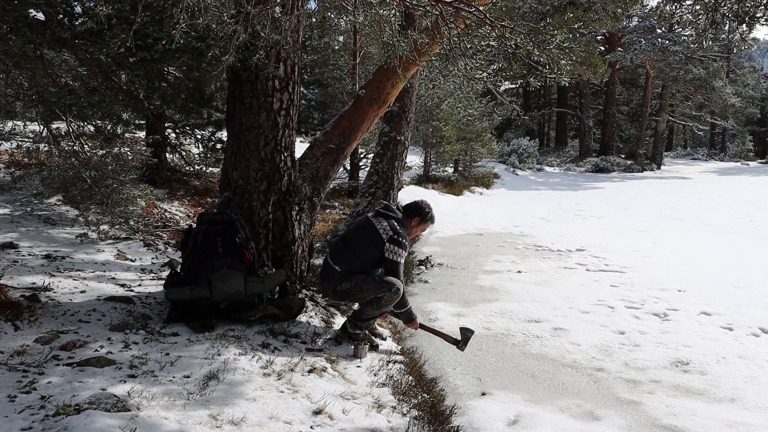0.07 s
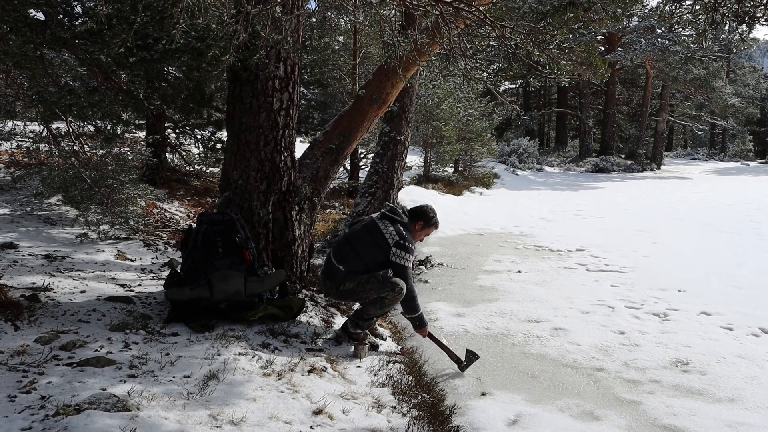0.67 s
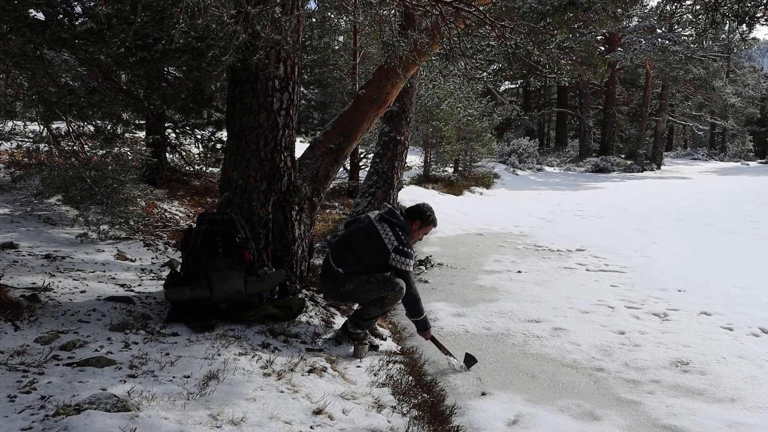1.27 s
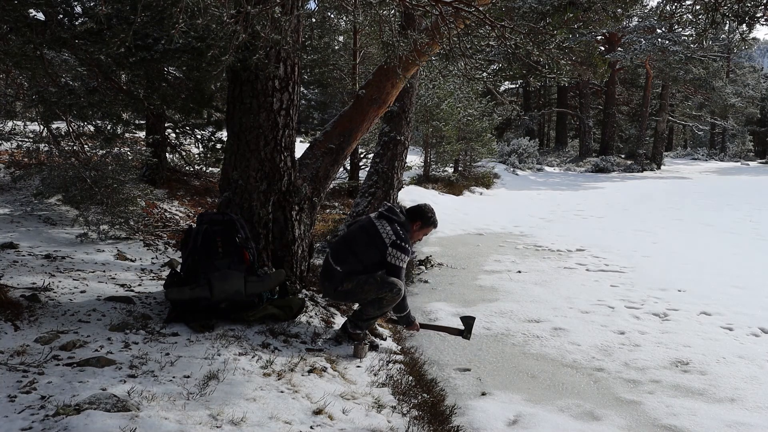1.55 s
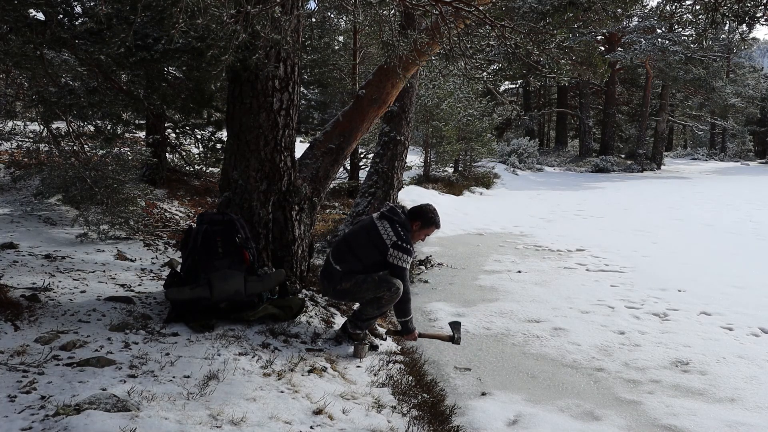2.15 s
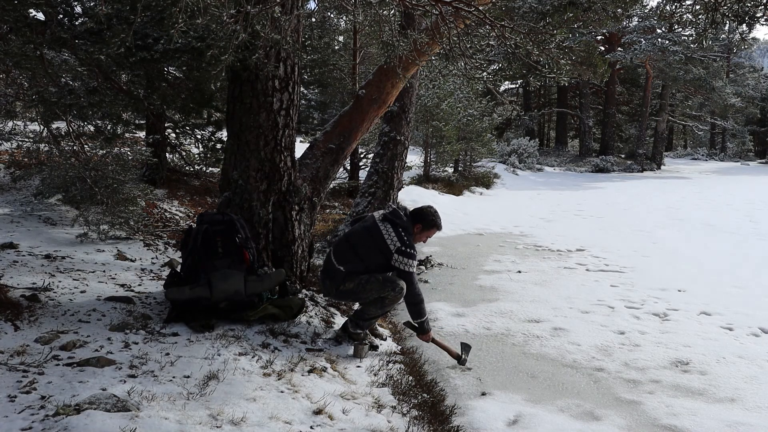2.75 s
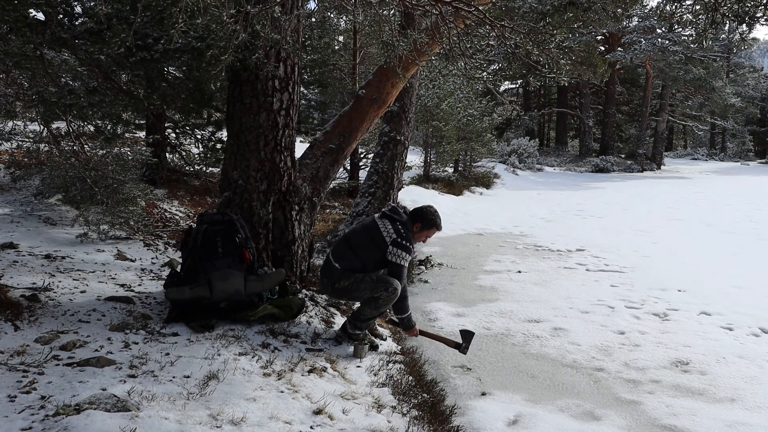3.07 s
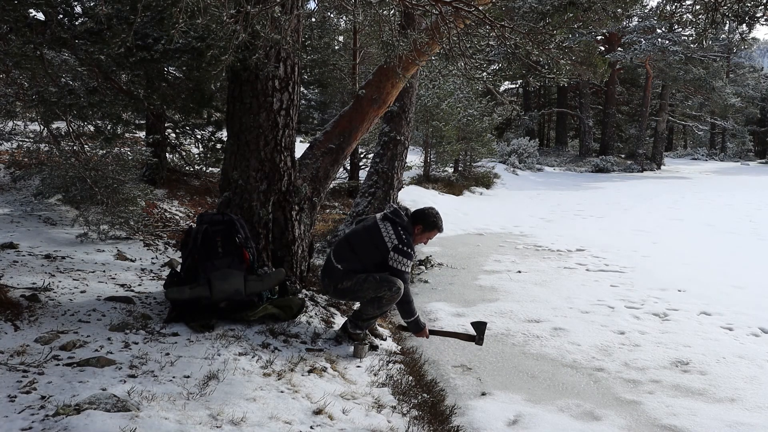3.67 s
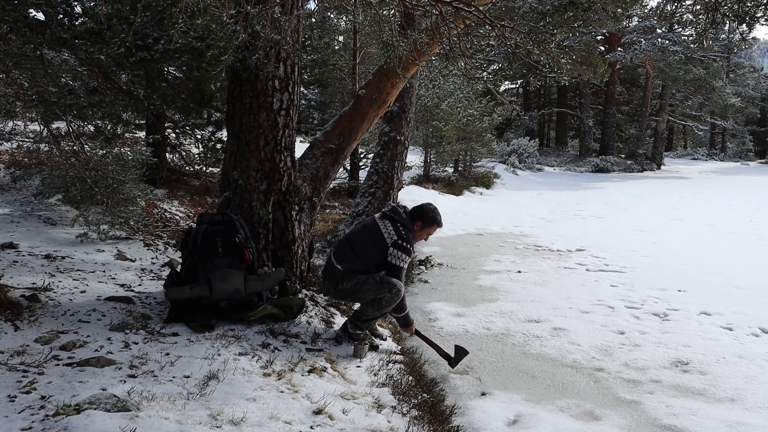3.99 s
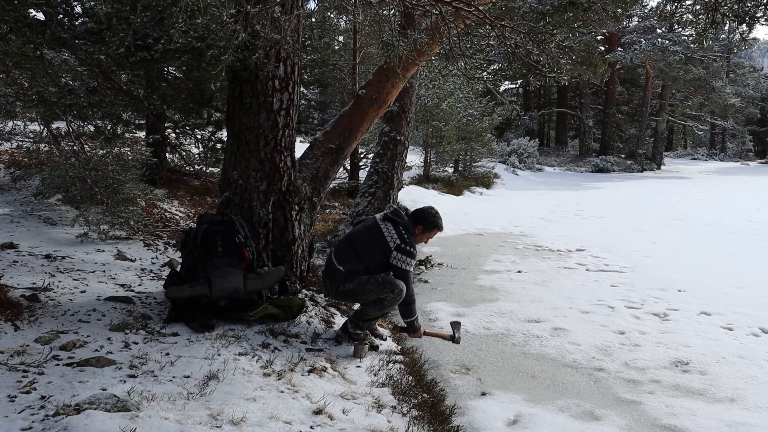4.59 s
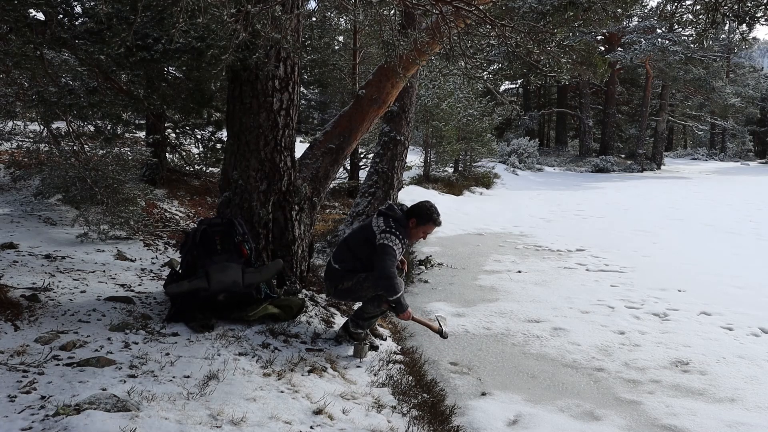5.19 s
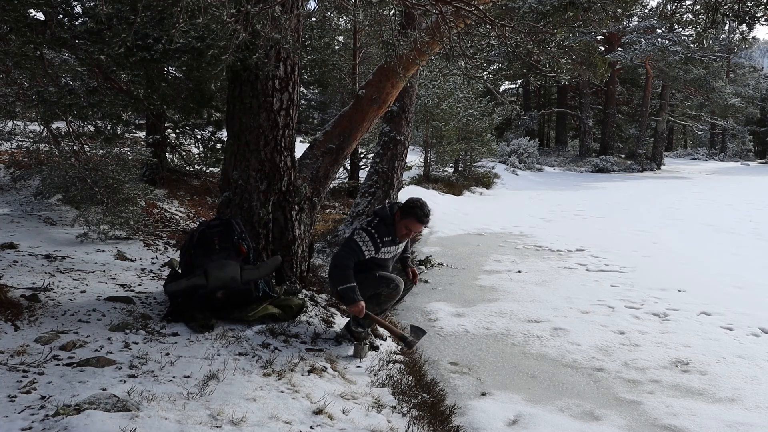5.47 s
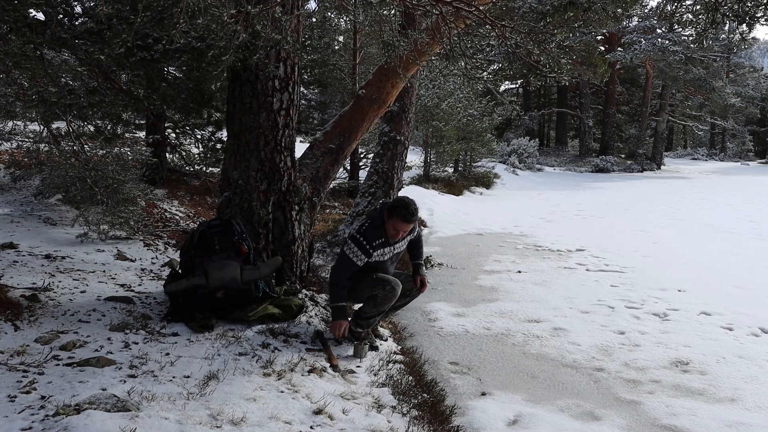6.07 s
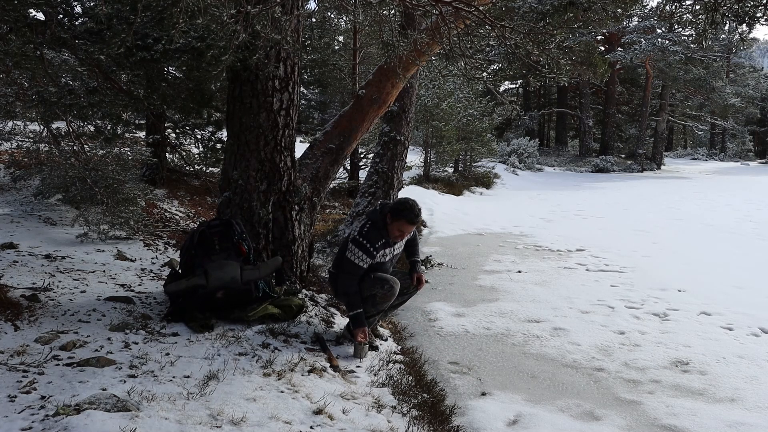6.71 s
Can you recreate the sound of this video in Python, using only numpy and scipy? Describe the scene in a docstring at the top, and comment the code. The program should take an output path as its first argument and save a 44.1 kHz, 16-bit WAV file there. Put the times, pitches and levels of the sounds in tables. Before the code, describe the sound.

An axe chops nearby into the ice of a frozen forest lake, over a faint hush and a light wind rumble on the microphone. The sound opens on fading slush. Blows land at about 0.7, 1.3, 1.9, 2.4, 2.9, 3.4 and 3.9 seconds, with a last one at 4.8 after a short pause. Each is a thump and a sharp, brittle crack, with a small wet splash, a faint high steel ring and a thin echo from the trees. Ice chips tick and tinkle between blows, mostly in the first two seconds, and small bubbles plop near 3.1 and 4.1. From 5 seconds boots shuffle quietly in wet snow, with a soft thud at 5.4. The axe is laid down with a faint rattle around 6 seconds. A very faint, distant whine follows and fades, and thin metal clinks lightly at about 6.6.

```python
"""At the edge of a frozen forest lake, an axe chops a hole in the ice. Each impact excites damped modes
of the sheet and the steel head, and brittle fracture releases runs of snaps. Chips patter down, slush
and bubbles gurgle, and boots shift in wet snow. The axe is laid down and thin metal clinks, each ringing
in its own modes. Behind it are the hush and echo of the trees, light turbulent wind on the microphone
and, near the end, a faint far whine."""
import sys
import numpy as np
from scipy import signal
from scipy.fft import rfft, irfft, next_fast_len
from scipy.io import wavfile
from scipy.ndimage import uniform_filter1d

SR = 44100
rng = np.random.default_rng(int(sys.argv[2]) if len(sys.argv) > 2 else 0)


def persist_wave(psi):
    """Save psi, clipped to +-1, as 16-bit WAV."""
    counts = np.round(np.clip(psi, -1, 1) * 32767).astype(np.int16)
    wavfile.write(sys.argv[1], SR, np.atleast_2d(counts).T)


N = 306054
CLOCK = np.arange(N) / SR  # scene time/s
T = np.arange(int(.7 * SR)) / SR  # time within one event/s

# Relative spectral densities: f/Hz, level/dB
HUSH_SPECTRUM = [(59, -39.5), (100, -3.5), (150, -6.5), (570, -8), (1760, -17), (3190, -18.5),
                 (3780, -22.5), (4770, -20), (5650, -22), (15000, -24), (16000, -28.5)]  # still forest air
WIND_SPECTRUM = [(8, -5), (25, 3.5), (45, -2.5), (70, -12), (100, -21.5), (150, -31), (300, -76),
                 (1000, -100)]  # turbulence at the microphone
GRIT_SPECTRUM = [(100, -7), (800, -6), (1700, -28), (2700, 4.5), (3800, -11), (4800, 8), (6000, -5),
                 (10000, 0), (16000, -11)]  # grit scraping under metal
SLUSH_SPECTRUM = [(60, 1.5), (200, -9), (600, -4), (1300, 0.5), (2800, -9), (3800, -14), (4900, -8.5),
                  (6000, -20), (10000, -22), (16000, -35)]  # slush and wet snow
CHIP_SPECTRUM = [(200, -36.5), (1200, -2), (2500, 0.5), (4800, 4), (6000, -6.5), (8000, 2.5), (12000, -3.5),
                 (16000, -11.5)]  # small pieces of ice colliding
LEAD_IN_SPECTRUM = [(100, 2.5), (600, 6), (1600, 7.5), (3000, -12), (6000, -22.5), (16000, -61)]  # dull rush of noise just before a blow
CRACK_SPECTRUM = [(60, -68.5), (180, 4), (450, 4), (850, 0.5), (1500, 5), (2000, 0.5), (2900, 3.5),
                  (3700, -7.5), (4800, -5.5), (5900, -20), (7800, -13), (11000, -19.5), (16000, -31)]  # hard ice breaking
ECHO_SPECTRUM = [(80, 3.5), (300, -18.5), (1500, -8.5), (3000, -13.5), (6000, -7.0), (16000, -74)]

# Normal modes: f/Hz, relative level/dB, t60/s
AXE_HEAD_MODES = [(4893, 0, .32), (4874, -9, .2), (4635, -10, .09), (2299, -21, .3), (9760, -30, .22)]  # the steel head in a blow
AXE_BODY_MODES = [(810, -9, 0.12), (1280, -3.5, 0.07), (2025, -6.5, 0.096), (2620, -1, 0.043),
                  (2735, -3, 0.082), (3020, -4.5, 0.11), (3380, 0, 0.04), (4800, -2, 0.068),
                  (4830, -1.5, 0.11), (7800, -7, 0.12), (8538, -9, .2)]  # the axe as it is laid down
THIN_METAL_MODES = [(860, -11.5, 0.24), (1264, -15.5, 0.24), (1860, -25, 0.35), (2400, -7, 0.17),
                    (2840, -14.5, 0.34), (3140, -16, 0.12), (4800, 1.5, 0.068), (4960, -8, 0.16),
                    (6030, -13, 0.11), (6940, -3, 0.096), (7700, -6, 0.15), (8320, 0, 0.076),
                    (9770, -6, 0.085), (10550, -1, 0.06), (11215, -9, 0.083), (11600, -7, 0.1),
                    (12500, -15, .08)]  # a thin metal object

# Strength of the wind on the microphone: t/s, level/dB
WIND_LEVELS = [(0.0, -45), (0.04, -44.5), (0.89, -51), (0.93, -42), (1.59, -62), (2.32, -40), (2.47, -55),
               (2.51, -41.5), (3.36, -41.5), (3.44, -54), (3.52, -35.5), (3.86, -42.5), (4.76, -40.5),
               (4.83, -49), (5.16, -45.5), (5.2, -54.5), (6.9, -49), (6.94, -53)]
# Light impacts: t/s, level/dB
FOOTFALLS = [(5.072, -47), (5.179, -45.5), (5.415, -29.5), (6.246, -51), (6.735, -45.5)]  # boots on the edge of the ice
AXE_CONTACTS = [(5.9965, -50), (6.009, -57), (6.092, -63), (6.116, -62), (6.175, -68.5), (6.205, -63),
                (6.238, -59)]  # the axe settling
THIN_METAL_CONTACTS = [(6.6424, -43.5), (6.672, -56.5)]  # the thin metal touching down
# Swells of granular noise: centre t/s, duration/s, level/dB
SNOW_SHUFFLES = [(5.22, 0.66, -63), (5.45, 0.19, -57), (5.8, 0.39, -62), (6.12, .2, -64.5),
                 (6.9, 0.15, -63)]  # boots and clothes shifting on snow
CRUMB_SHOWERS = [(.87, 0.094, -61), (1.06, 0.27, -58), (1.64, 0.14, -56.5), (1.755, 0.11, -52.5),
                 (3.08, .24, -67), (4.17, 0.12, -68)]  # ice crumbs shed as the blade is pulled free
# Air bubbles in the hole: t/s, level/dB, starting f/Hz, t60/s
HOLE_BUBBLES = [(3.074, -40.5, 1840, 0.036), (4.077, -50, 800, 0.015), (4.079, -34.5, 460, 0.011),
                (4.1134, -35, 1340, 0.013), (4.117, -48.5, 2090, 0.033), (5.416, -34, 670, 0.0087)]
# Larger chips landing or kicked: t/s, level/dB, f/Hz, treble shelf/dB
CHIP_IMPACTS = [(0.346, -49, 3840, -1), (0.4457, -48, 7000, -6), (0.627, -48.5, 3520, 9),
                (0.8334, -42, 4920, 26), (.8435, -49, 5000, 2), (0.9465, -47, 1590, -16),
                (0.963, -44.5, 2090, -7.5), (1.0039, -46, 4950, -3), (1.0597, -40, 2840, 2.5),
                (1.096, -45, 3120, -3), (1.111, -46, 11000, 8), (1.602, -45, 2220, -18),
                (1.6201, -39.5, 4870, -10), (1.6746, -44, 2110, -9), (1.7273, -42, 5000, 21),
                (2.1027, -50, 9100, 11), (3.0138, -48.5, 2900, -6), (3.0705, -46.5, 4580, 1),
                (3.101, -48, 4340, -14), (5.473, -54.5, 1520, -29), (5.819, -54, 2120, -5),
                (6.870, -53, 2400, -19)]
# First cracks, then the ice giving way: t/s, level/dB, t60/s, f/Hz of the piece, treble shelf/dB
ICE_CRACKS = [(.6676, -10.5, 0.012, 1030, 7.5), (0.6749, -17.5, 0.05, 2300, 3.5),
              (0.6973, -31, 0.028, 1460, 4), (1.3462, -18, 0.024, 1560, -2.5), (1.3580, -32, 0.21, 1410, 1),
              (1.3800, -31.5, 0.026, 2650, 9), (1.3893, -26, 0.049, 1450, 0),
              (1.8704, -20, 0.066, 1970, 7.5), (1.8807, -27, 0.019, 1620, 4), (2.3648, -21, 0.062, 2140, 5),
              (2.3718, -20.5, 0.027, 1610, -21), (2.8818, -21, 0.037, 1210, 4.5),
              (2.894, -35, 0.22, 990, -9), (3.4000, -19.5, 0.031, 2550, 3.5), (3.4120, -44, 0.15, 604, 10),
              (3.928, -16, 0.013, 1350, 5), (3.9307, -16.5, 0.007, 2620, 7), (3.9350, -27, 0.05, 2180, 5),
              (4.7884, -22.5, 0.044, 1940, 8.5), (4.8000, -24, 0.1, 1110, 1.5)]
# Axe blows: t/s, thump level/dB, thump f/Hz, knock level/dB, knock f/Hz, slush level/dB, slush t60/s,
# steel level/dB, rebound level/dB, backwash level/dB
AXE_BLOWS = [(-.09, -18, 220, -14, 900, -43.5, 0.83, -40, -35, -69),
             (0.6672, -17, 232, -9, 704, -33.5, 0.23, -34, -32, -64),
             (1.3465, -18.5, 328, 0, 1664, -31.5, 0.34, -48, -39, -53),
             (1.8706, -14.5, 201, -26, 900, -35, 0.21, -53, -31.5, -65.5),
             (2.3653, -11, 424, -15.5, 1630, -29, 0.13, -51.5, -37, -78),
             (2.882, -8.5, 303, -11.5, 683, -33, 0.21, -40, -42, -60),
             (3.4000, -20.5, 292, -4, 555, -62, 0.11, -55, -29, -83),
             (3.9272, -25.5, 263, -7, 930, -25.5, 0.2, -49, -34, -59),
             (4.789, -13, 185, -14.5, 870, -40, 0.36, -39.5, -38, -66)]


def amp(db):
    """Amplitude ratio: a factor of ten for every 20 dB."""
    return 10 ** (np.asarray(db) / 20)


def unit(x):
    """Normalisation to an rms of 1."""
    return x / np.sqrt(np.mean(x ** 2) + 1e-20)


def decay(t60):
    """Exponential damping: 60 dB in t60 seconds."""
    return np.exp(-np.log(1000) * T / max(t60, 1e-3))


def add(mix, s, sound):
    """Superposition: a sound joins the mix at s seconds."""
    start = round(s * SR)
    sound = sound[max(-start, 0):]
    part = mix[max(start, 0):][:len(sound)]
    part += sound[:len(part)]


def colour(x, spectrum, piece_hz=1000, piece_db=0, treble_db=0, width=0.53):
    """Minimum-phase filter of unit power gain: a spectrum, a resonance (half-width/octaves), a shelf."""
    size = 2 * next_fast_len(len(x) // 2 + 2048)
    octave = np.log2(np.fft.rfftfreq(size, 1 / SR) + 1)
    hz, db = np.transpose(spectrum)
    resonance = piece_db / (1 + ((octave - np.log2(piece_hz)) / width) ** 2)
    shelf = treble_db * np.clip(octave - np.log2(3000), 0, 1)
    log_gain = np.log(unit(amp(np.interp(octave, np.log2(hz), db) + resonance + shelf)))
    phase = -signal.hilbert(np.r_[log_gain, log_gain[-2:0:-1]]).imag[:len(octave)]
    return irfft(rfft(x, size) * np.exp(log_gain + 1j * phase))[:len(x)]


def grains(samples, per_s, spread_db):
    """Shot noise: independent clicks of uneven size, rms 1."""
    size = amp(spread_db * np.minimum(rng.exponential(1, samples), 4))
    return unit(size * rng.choice([-1, 1], samples) * (rng.random(samples) < per_s / SR))


def burst(t60, per_s, spread_db):
    """Decaying shot noise, whitened over broad bands but ragged in fine detail."""
    spectrum = rfft(grains(len(T), per_s, spread_db) * decay(t60))
    broad = np.sqrt(np.abs(uniform_filter1d(np.abs(spectrum) ** 2, size=701)) + 1e-20)
    clicks = irfft(spectrum / broad, len(T)) * decay(10 * t60)
    return clicks * np.linalg.norm(decay(t60)) / np.linalg.norm(clicks)


def mode(hz, t60, glide=0):
    """Damped oscillator of frequency hz * (1 + 2 * glide * t)."""
    return np.sin(2 * np.pi * hz * (T + glide * T ** 2)) * decay(t60)


def pings(samples, per_s, low_hz, high_hz, cycles, spread_db, glide, count=24):
    """Random excitation of many small resonators, each with its own pitch; rms 1."""
    clicks, which = grains(samples, per_s, spread_db), rng.integers(0, count, samples)
    out = np.zeros(samples)
    for k, hz in enumerate(np.geomspace(low_hz, high_hz, count) * rng.uniform(1.0, 1.04, count)):
        ping = mode(hz, cycles / hz, glide)[:2048]
        out += signal.oaconvolve(clicks * (which == k), ping * np.sqrt(hz))[:samples]
    return unit(out)


def swells(rows):
    """Incoherent addition: Gaussian envelopes sum in power to give one gain curve."""
    return np.sqrt(sum((amp(db) * np.exp(-(2 * (CLOCK - s) / length) ** 2)) ** 2
                       for s, length, db in rows))


def hush():
    """Stationary broadband noise: the still air of the forest."""
    return amp(-62.5) * colour(rng.standard_normal(N), HUSH_SPECTRUM)


def wind(eddy_db=1.5, eddy_s=.09):
    """Turbulence: passing eddies modulate a low rumble at the microphone."""
    strength_db = np.interp(CLOCK, *np.transpose(WIND_LEVELS))
    eddies = np.interp(CLOCK / eddy_s, np.arange(N), rng.standard_normal(N))
    return amp(strength_db + eddy_db * eddies) * colour(rng.standard_normal(N), WIND_SPECTRUM)


def whine(start_s=6.15, rise_s=0.058, fade_db_per_s=23, sag_hz_per_s=47):
    """Frequency modulation: a faint far tone wavers and sags as it fades."""
    age = np.maximum(CLOCK - start_s, 0)
    waver = unit(uniform_filter1d(rng.standard_normal(N), size=900))
    hz = 646 - sag_hz_per_s * age + 11 * waver
    level = np.minimum(age / rise_s, 1) * amp(-61.5 - fade_db_per_s * age)
    return level * np.sin(2 * np.pi * np.cumsum(hz) / SR)


def forest_echo(x, echo_db, t60):
    """Scattering: the trunks return a thin, dull echo."""
    reflections = grains(len(T), 2000, 0.67) * decay(t60) * (1 - decay(0.052))
    tail = colour(reflections, ECHO_SPECTRUM)
    return amp(echo_db) * signal.fftconvolve(x, tail / np.linalg.norm(tail))[:N]


def flex(hz):
    """Flexural vibration: the loaded ice sheet gives a soft, short, low note."""
    return mode(hz, 11 / hz) * (1 - decay(0.013))


def wet_crunch():
    """Granular noise and bubble resonance: the crunch and gurgle of wet snow."""
    gurgle = pings(N, per_s=600, low_hz=620, high_hz=2900, cycles=18, spread_db=1.5, glide=6)
    return 0.66 * colour(grains(N, 1500, 2.5), SLUSH_SPECTRUM) + 0.5 * gurgle


def boots():
    """Compaction and bending: boots crunch wet snow and thud on the edge of the ice."""
    out = swells(SNOW_SHUFFLES) * wet_crunch()
    for s, db in FOOTFALLS:
        add(out, s, amp(db) * flex(hz=252))
    return out


def metal_landing(contacts, modes, chatter_t60, grit_db, grit_t60):
    """Forced vibration: chattering contacts drive the metal's modes while grit scrapes beneath."""
    out = np.zeros(N)
    for s, db in contacts:
        chatter = burst(chatter_t60, per_s=2700, spread_db=5.5)
        for hz, mode_db, t60 in modes:
            driven = signal.fftconvolve(chatter, mode(hz, t60))[:len(T)]
            add(out, s, amp(db + mode_db) * unit(driven) * np.std(decay(t60)))
        scrape = burst(grit_t60, per_s=3800, spread_db=4.0)
        add(out, s, amp(db + grit_db) * colour(scrape, GRIT_SPECTRUM))
    return out


def water(delay_s=.21, wash_s=0.26):
    """Bubble resonance: slush gurgles back after each blow; bubbles rise in pitch as they surface."""
    backwash = swells([(s + delay_s, wash_s, db) for s, *_, db in AXE_BLOWS])
    out = backwash * wet_crunch()
    for s, db, hz, t60 in HOLE_BUBBLES:
        add(out, s, amp(db) * mode(hz, t60, glide=21) * (1 - decay(0.0015)))
    return out


def debris(skitter_cycles=85):
    """Impact excitation: chips tick at their own resonances among showers of tinkling crumbs."""
    tinkle = pings(N, per_s=260, low_hz=2000, high_hz=9000, cycles=24, spread_db=3, glide=0)
    dust = colour(grains(N, 450, 3.5), CHIP_SPECTRUM)
    out = swells(CRUMB_SHOWERS) * (0.58 * tinkle + 0.67 * dust)
    for s, db, hz, treble_db in CHIP_IMPACTS:
        skitter = burst(skitter_cycles / hz, per_s=1100, spread_db=-1)  # longer for big, low chips
        tick = colour(skitter, CHIP_SPECTRUM, hz, piece_db=10.5, treble_db=treble_db, width=0.13)
        add(out, s, amp(db) * tick)
    return out


def fractures():
    """Brittle fracture: a rapid run of snaps, filtered by the resonance of the piece breaking off."""
    out = np.zeros(N)
    for s, db, t60, hz, treble_db in ICE_CRACKS:
        snaps = burst(t60, per_s=6000, spread_db=1.5)
        crack = colour(snaps, CRACK_SPECTRUM, hz, piece_db=7.0, treble_db=treble_db, width=0.34)
        add(out, s, amp(db) * crack)
    return out


def splash(t60):
    """Droplet impacts and bubble resonance: a blow stirs the slush into spray and froth."""
    spray = colour(grains(len(T), 3500, 4.6), SLUSH_SPECTRUM)
    froth = pings(len(T), per_s=500, low_hz=900, high_hz=3020, cycles=30, spread_db=7.5, glide=9.6)
    return (0.54 * spray + 0.41 * froth) * decay(t60) * (1 - decay(0.051))


def steel_ring():
    """Modal superposition: the ring of the axe head swells briefly, then dies away."""
    ring = sum(amp(db) * rng.choice([-1, 1]) * mode(hz, t60) for hz, db, t60 in AXE_HEAD_MODES)
    return ring * (1 - decay(0.27))


def chops(cutoff_hz=149):
    """Impulse response: each blow sets the sheet and the axe head vibrating and throws up slush."""
    sheet, out = np.zeros(N), np.zeros(N)
    for blow in AXE_BLOWS:
        s, thump_db, thump_hz, knock_db, knock_hz, slush_db, slush_t60, steel_db, rebound_db, _ = blow
        # water under the ice damps both modes within a few cycles
        add(sheet, s, amp(thump_db) * mode(thump_hz, 6 / thump_hz))
        add(sheet, s, amp(knock_db) * mode(knock_hz, 7 / knock_hz))
        add(sheet, s + .007, amp(rebound_db) * flex(hz=188))  # the sheet flexes back
        # a faint, dull, very short rush of noise just before each blow
        lead_in = colour(rng.standard_normal(len(T)) * decay(0.027), LEAD_IN_SPECTRUM)
        add(out, s - .003, amp(knock_db - 26.5) * lead_in)
        add(out, s, amp(slush_db) * splash(slush_t60))
        add(out, s, amp(steel_db) * steel_ring())
    # a high-pass keeps deep bass out of the sheet's notes
    bass_cut = signal.butter(3, cutoff_hz, "highpass", fs=SR, output="sos")
    return out + signal.sosfilt(bass_cut, sheet)


def scene():
    """Superposition: the near sources, their echo and the background sum in one channel."""
    near = chops() + fractures() + debris() + water() + boots()
    near += metal_landing(AXE_CONTACTS, AXE_BODY_MODES, chatter_t60=.035, grit_db=3, grit_t60=.12)
    near += metal_landing(THIN_METAL_CONTACTS, THIN_METAL_MODES,
                          chatter_t60=.016, grit_db=1, grit_t60=.08)
    return (near + forest_echo(near, echo_db=-32.0, t60=.7) + hush() + wind() + whine())[None]


def record(dry):
    """Saturation and band limiting: the hardest peaks overload softly, then pass a low-pass filter."""
    ceiling, edge_hz = .34, 16000
    clipped = dry / (1 + (dry / ceiling) ** 6) ** (1 / 6)
    lowpass = signal.firwin(255, edge_hz, window=("kaiser", 8), fs=SR)
    return signal.oaconvolve(clipped, lowpass[None], "same")


dry = scene()
out = record(dry)
persist_wave(out)
```